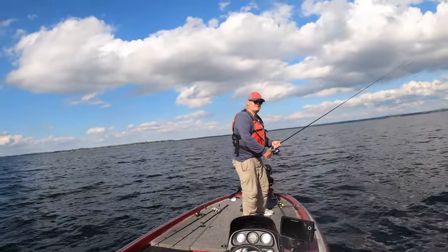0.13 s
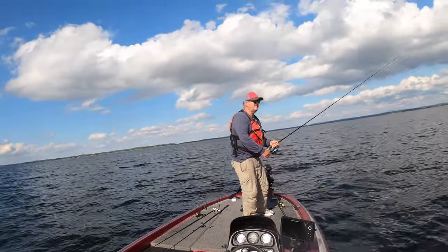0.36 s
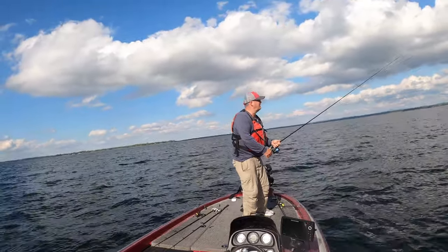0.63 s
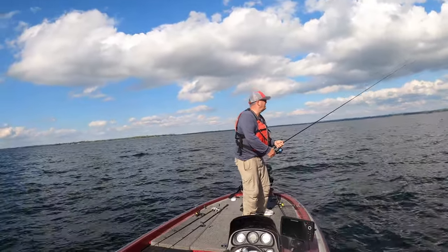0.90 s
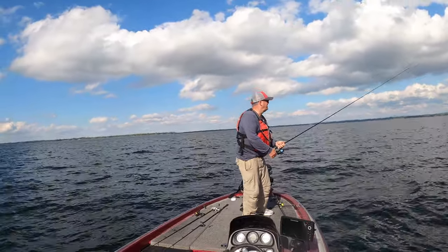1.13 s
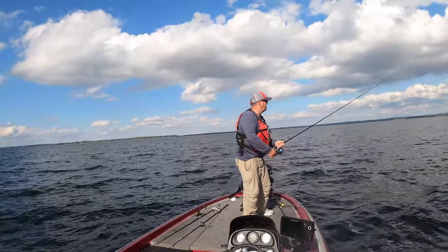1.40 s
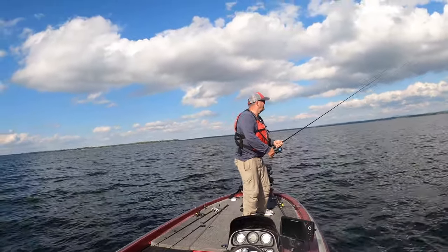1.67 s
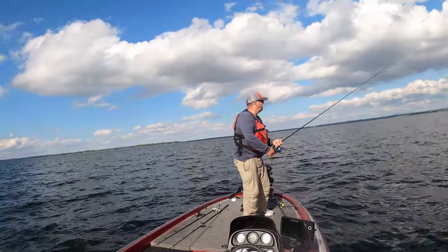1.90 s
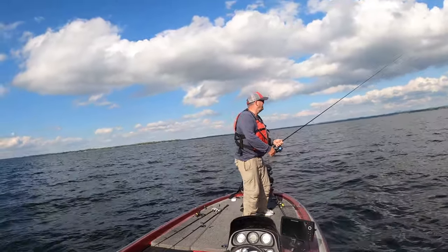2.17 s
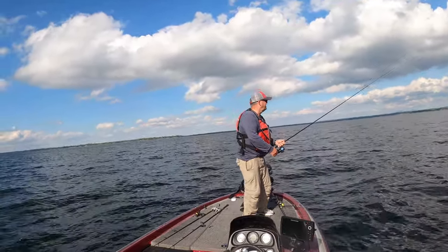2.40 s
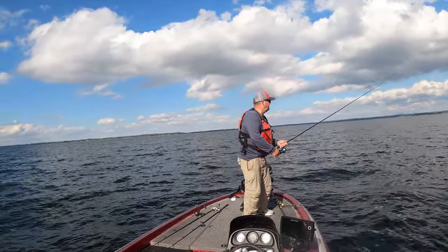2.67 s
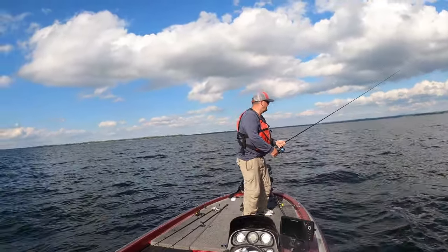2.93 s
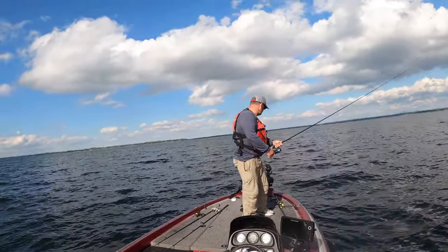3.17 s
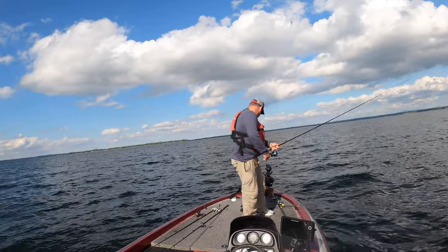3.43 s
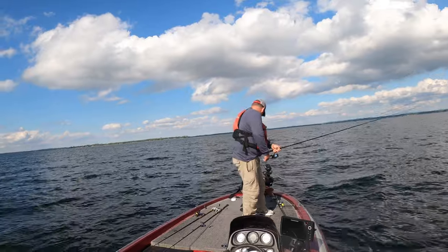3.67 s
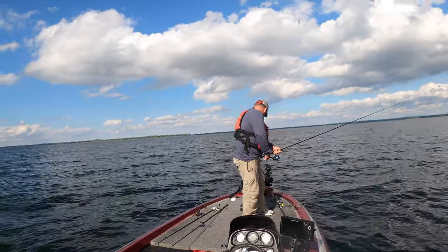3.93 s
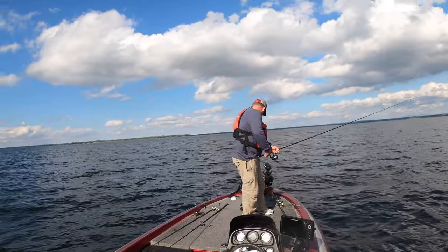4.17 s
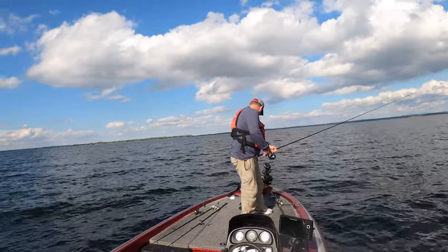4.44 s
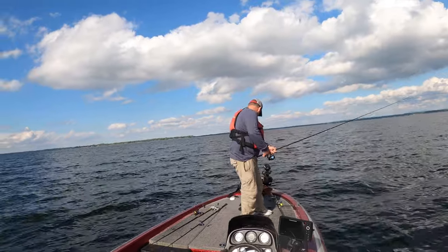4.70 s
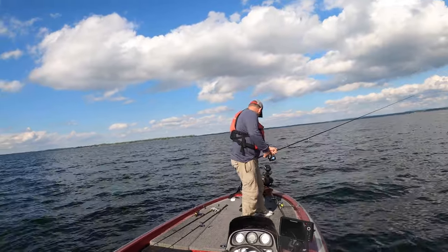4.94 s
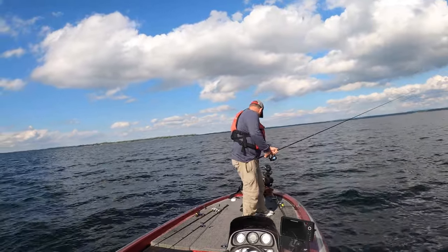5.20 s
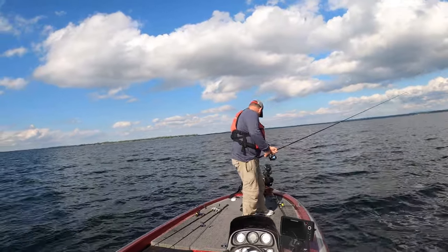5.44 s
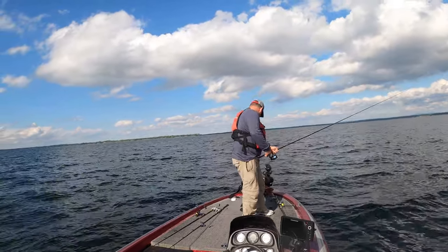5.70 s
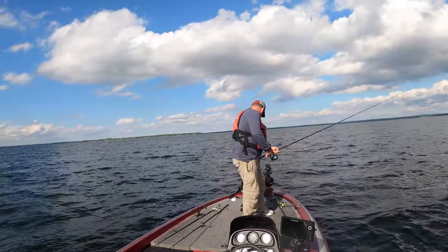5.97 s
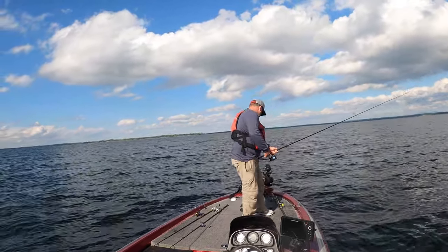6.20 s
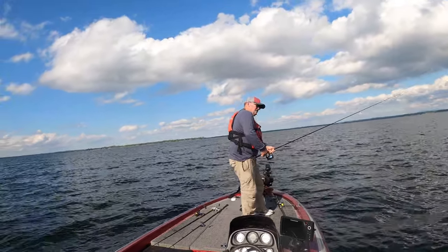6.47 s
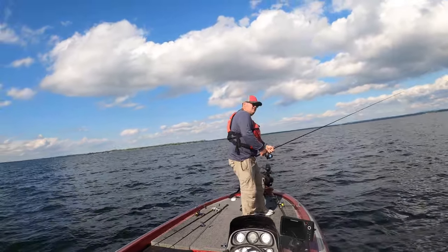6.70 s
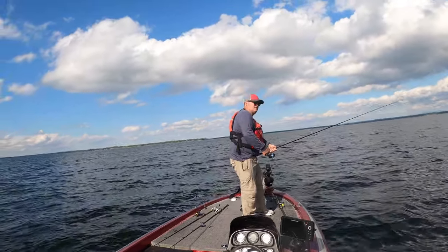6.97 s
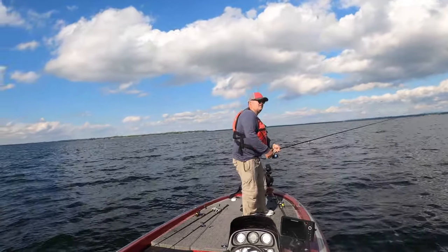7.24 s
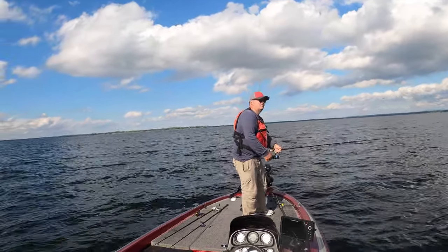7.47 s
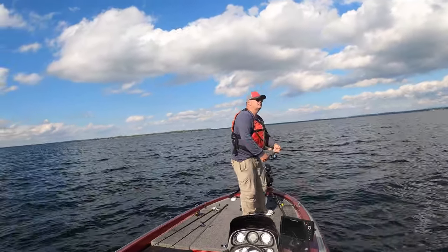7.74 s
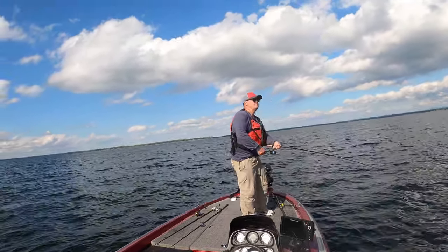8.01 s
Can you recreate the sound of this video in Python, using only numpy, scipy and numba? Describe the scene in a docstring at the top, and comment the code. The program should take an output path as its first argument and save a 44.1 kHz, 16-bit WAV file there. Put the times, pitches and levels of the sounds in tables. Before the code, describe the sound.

Outdoors on a choppy lake, a microphone on a small boat catches deep wind rumble with soft thumps. Small waves lap the hollow hull irregularly: dull knocks, bubbly plops, droplet ticks and brief fizz. The wind is heavier early and thins later, when a sharp double slap stands out past six seconds, followed by more splashing. The sound is nearly mono, widening near the end.

```python
"""On a choppy lake a small boat rocks. Wind is low-passed noise with slow heaves, flutter and thumping eddies.
Waves excite the hollow hull, a bank of damped modes; washing water is clouds of tiny ringing bubbles
over hiss. Plops and sliding gurgles are air in water; spray ticks are clusters of short rings, and
bursts of water are decaying noise. The stereo image is nearly closed at first and opens late."""
import sys
import numpy as np
from scipy import signal
from scipy.fft import rfft, irfft, next_fast_len
from scipy.io import wavfile
from scipy.ndimage import uniform_filter1d
from numba import njit

SR = 44100
rng = np.random.default_rng(int(sys.argv[2]) if len(sys.argv) > 2 else 0)


def to_wav(sig):
    """Store sig (one row per channel, or 1-D mono) as 16-bit WAV at the path in sys.argv[1].

    Samples outside -1..1 are clipped; the rate is SR.
    """
    pcm = np.clip(np.atleast_2d(sig), -1, 1) * 32767
    pcm = np.round(pcm).astype(np.int16)
    wavfile.write(sys.argv[1], SR, pcm.T)  # frames by channels


def volts(x):
    """Linear amplitude factor 10**(x/20) for a level x in dB, scalar or array-like."""
    e = np.asarray(x, float) / 20
    return 10 ** e


N = 357853  # samples


def curve(table):
    """Linear interpolation: each column after time becomes one value a sample."""
    s, *columns = np.transpose(table)
    return [np.interp(np.arange(N) / SR, s, c) for c in columns]


def colour(x, points, lo_hz=0., hi_hz=1e5, tilt_db=0.):
    """Linear filtering: gain through (Hz, dB) points, two soft band edges and a tilt in dB per octave."""
    n = next_fast_len(len(x))
    hz = np.fft.rfftfreq(n, 1 / SR) + 1  # offset keeps the logarithm finite
    p = np.array(points)
    edge = np.sqrt(1 / (1 + (lo_hz / hz) ** 8) / (1 + (hz / hi_hz) ** 8))
    db = np.interp(np.log(hz), np.log(p[:, 0]), p[:, 1]) + tilt_db * np.log2(hz / 1000)
    return irfft(rfft(x, n) * volts(db) * edge, n)[:len(x)]


def unit(x):
    """Normalization of mean power: scale to rms 1."""
    return x / np.sqrt(np.mean(x ** 2))


def even(x, s, share):
    """Envelope compression: iron out a share of the chance swelling of noise over windows of s seconds."""
    return unit(x / (uniform_filter1d(x ** 2, int(s * SR)) + 1e-18) ** (share / 2))


def walk(rate):
    """Smoothed random modulation: levels held 1 / rate s and slewed twice; spread near 1."""
    k = int(SR / rate)
    held = np.repeat(rng.standard_normal(N // k + 1), k)
    return 1.2 * uniform_filter1d(uniform_filter1d(held, k), k)[:N]


@njit
def ring(n, sr, s, size, hz, t60, rise, onset):
    """Damped oscillators: each swells over onset s and may climb by rise octaves/s, as a bubble surfacing."""
    out = np.zeros(n)
    for e in range(len(s)):
        i, z, open_ = int(s[e] * sr), size[e] + 0j, 0.
        w = 2 * np.pi * hz[e] / sr
        fade = np.exp(-6.9 / (t60[e] * sr))
        climb = 2 ** (rise[e] / sr)
        for k in range(max(i, 0), min(i + int(.8 * t60[e] * sr), n)):
            z *= fade * np.exp(1j * w)
            w = min(w * climb, 2.8)  # stay below the Nyquist limit
            open_ += (1 - open_) / (1 + onset[e] * sr)
            out[k] += open_ * z.imag
    return out


def swarm(count, lo_hz, hi_hz, cycles, spread_db, rise):
    """Superposition of random bubbles: most faint, a few loud; each climbs by rise octaves per t60."""
    u = rng.random((count, 3))
    hz = lo_hz * (hi_hz / lo_hz) ** u[:, 1]
    t60 = cycles / hz
    size = volts(spread_db * np.minimum(-np.log(1 - u[:, 2]), 3.)) * hz
    return unit(ring(N, float(SR), u[:, 0] * N / SR, size, hz, t60, rise / t60, 2.5 / hz))


def swells(s, db, rise, fall):
    """Incoherent addition: the powers of overlapping swells sum; returns the total level in dB."""
    t = np.arange(0, N / SR + .002, .001)
    u = t - s[:, None]
    span = np.where(u < 0, rise[:, None], fall[:, None])  # seconds for 20 dB
    power = volts(2 * db[:, None] - 40 * np.abs(u) / span).sum(axis=0)
    return np.interp(np.arange(N) / SR, t, 10 * np.log10(uniform_filter1d(power, size=9) + 1e-14))


# gust strength, levels before each layer's trim:
# (time [s], rumble level [dB], flutter level [dB], hull drumming level [dB])
GUSTS = [(0.0, -43, -54.5, -58.5), (0.38, -46, -55, -62), (0.99, -40, -44.5, -47),
         (1.53, -45, -57.5, -56.5), (1.83, -44, -50.5, -59.5), (2.48, -39.5, -49, -55.5),
         (2.96, -44, -55, -57), (3.41, -45, -54, -60.5), (3.66, -50.5, -56, -54), (3.84, -39, -57.5, -52),
         (3.97, -44, -56, -55), (4.4, -53.5, -55, -60), (4.7, -45.5, -57, -59.5), (5.19, -47, -55.5, -54),
         (5.44, -50, -56.5, -62), (5.76, -48, -60, -60), (6.05, -46.5, -56, -61.5),
         (6.25, -49, -52.5, -57.5), (6.44, -55, -57.5, -68.5), (6.75, -68.5, -59.5, -64),
         (7.09, -56.5, -59, -59.5), (7.45, -43, -53.5, -59.5), (7.75, -62.5, -53.5, -56.5),
         (8.11, -57.5, -58, -63.5)]
# spectrum of wind rumble and of the waves' push: (frequency [Hz], relative density [dB])
RUMBLE_SPECTRUM = [(8.8, -25), (15, 3), (43, -4), (60, -3.5), (95, -10), (129, -11.5), (197, -11),
                   (362, -27), (439, -30), (700, -38), (910, -68), (1540, -120)]


def wind():
    """Turbulent pressure at the microphone port: low noise in slow heaves and a faster flutter."""
    rumble_db, flutter_db, _ = curve(GUSTS)
    heave = even(colour(rng.standard_normal(N), RUMBLE_SPECTRUM, hi_hz=78.0), 0.44, 0.29)
    flutter = even(colour(rng.standard_normal(N), RUMBLE_SPECTRUM, 70., 151.0), 0.1, 0.27)
    flutter_gain = volts(flutter_db + 7.0 + 2.4 * walk(9))
    return volts(rumble_db + 5.0) * heave + flutter_gain * flutter


# single eddies thumping the microphone:
# (time [s], rms level at the peak [dB], central pitch [Hz], length at half amplitude [s])
EDDIES = [(0.02, -44, 122, 0.034), (0.525, -39, 51.3, 0.13), (0.564, -40.5, 41.05, 0.15),
          (0.689, -39.5, 51.4, 0.028), (0.826, -30.5, 51, 0.14), (0.846, -36, 98.4, 0.072),
          (0.938, -34.5, 91.2, 0.039), (0.939, -34.5, 40, 0.25), (1.021, -32, 40.9, 0.057),
          (1.207, -41.5, 42, 0.61), (1.34, -31, 40, 0.071), (1.752, -31, 106, 0.026),
          (2.017, -34, 41.57, 0.15), (2.19, -37, 89.8, 0.034), (2.228, -31.5, 36.04, 0.07),
          (2.445, -26, 48.2, 0.03), (2.446, -35, 87.3, 0.021), (2.572, -35, 44.1, 0.032),
          (2.588, -40.5, 125.2, 0.061), (2.93, -35, 35.47, 0.056), (3.229, -34, 36.4, 0.043),
          (3.46, -34, 42.56, 0.077), (3.866, -32.5, 45, 0.051), (3.867, -42, 107, 0.11),
          (4.07, -40.5, 50.2, 0.29), (4.239, -38, 35.63, 0.035), (5.304, -35, 45.7, 0.058),
          (5.999, -29, 32, 0.059), (6.057, -36, 122, 0.082), (6.082, -45.5, 36.23, 0.13),
          (6.333, -45, 123.4, 0.02), (6.361, -33, 36.4, 0.093), (6.412, -43, 128, 0.09),
          (6.647, -34, 32.63, 0.033), (7.379, -38, 46.7, 0.064), (7.523, -43, 41, 0.048),
          (7.56, -40.5, 108, 0.027), (7.674, -37, 131.6, 0.06), (7.707, -38.5, 51.7, 0.16)]


def buffets():
    """Eddies as Gaussian wave packets whose frequency wanders about a central pitch."""
    out = np.zeros(N)
    turns = np.cumsum(2 ** (0.32 * walk(30))) / SR  # an eddy has no firm pitch
    t = np.arange(N) / SR
    for (s, db, hz, length), start in zip(EDDIES, rng.random(len(EDDIES))):
        near = slice(max(int((s - 2 * length) * SR), 0), int((s + 2 * length) * SR))
        envelope = .5 ** ((2 * (t[near] - s) / length) ** 2)
        tone = np.sin(2 * np.pi * (hz * turns[near] + start))
        out[near] += np.sqrt(2) * volts(db) * envelope * tone
    return out


def surge():
    """Broadband forcing: waves push the hull steadily, heard as noise in a low band."""
    push = rng.standard_normal(N) * volts(1.8 * walk(16))
    return volts(curve(GUSTS)[2] + 2.5) * unit(colour(push, RUMBLE_SPECTRUM, 177.0, 400.0))


# laps of water along the hull; rise and fall of the fizz span 20 dB, levels before layer trims:
# (crest time [s], fizz level [dB], rise [s], fall [s], spray over fizz [dB])
LAP_SWELLS = [(0.021, -57.5, 0.053, 0.064, -11.5), (0.053, -70, 0.03, 0.074, 4),
              (.13, -65, 0.14, 0.24, -5.5), (.25, -67, 0.068, 0.046, 1.5), (0.311, -66, 0.081, 0.16, -9),
              (.55, -79, 0.55, 0.68, -7), (.8, -53, 0.052, 0.13, -13), (.84, -57, 0.1, 0.11, -4.5),
              (.97, -68, 0.18, 0.22, -6.5), (1.08, -62, 0.034, 0.11, -14), (1.12, -66, .04, 0.032, -14),
              (1.4, -65.5, 0.29, 0.33, -1.5), (1.58, -64, 0.87, 0.61, -13.5), (1.75, -70.5, 0.41, 0.17, -2),
              (1.91, -59.5, 0.15, 0.24, -7.5), (2.03, -68.5, 0.053, 0.1, 1.5),
              (2.13, -61.5, 0.033, 0.08, -5.5), (2.2, -69, 0.044, 0.33, -7),
              (2.33, -71.5, 0.063, 0.56, -24), (2.43, -74, 0.05, 0.12, 0), (2.6, -71.5, 0.071, 0.08, 5),
              (2.78, -67.5, 0.17, 0.14, -6), (2.97, -69, 0.33, 0.44, -4), (3.228, -64, 0.024, 0.045, -23),
              (3.27, -67.5, 0.034, 0.067, -18), (3.41, -71.5, 0.44, 0.77, -4),
              (3.62, -80.5, 0.4, 0.55, 2.5), (3.812, -54.5, 0.13, 0.14, -6.5),
              (3.901, -61, 0.038, 0.29, -2.5), (4.0, -59, 0.069, 0.091, -9.5), (4.12, -86, 0.27, 0.16, -5),
              (4.27, -66.5, 0.44, 0.31, 2), (4.42, -59.5, 0.4, 0.32, -7.5), (4.56, -69, 0.11, 0.59, -7),
              (4.68, -71, 0.21, 0.17, -0.5), (4.77, -59, 0.033, 0.085, -3.5), (4.95, -67, 0.21, 0.88, -8),
              (5.149, -53.5, 0.064, 0.07, -5.5), (5.23, -66, 0.13, 0.13, 0), (5.47, -73, 0.053, 0.45, -4),
              (5.64, -64.5, 0.017, 0.053, -28), (5.89, -76.5, 0.15, 0.32, -7),
              (6.035, -59.5, 0.032, 0.11, -9), (6.252, -51, 0.082, 0.23, -4.5),
              (6.39, -57, 0.15, 0.12, -22), (6.44, -59, 0.071, 0.12, -19), (6.63, -63, 0.37, 0.26, -4),
              (6.749, -63.5, 0.29, 0.13, -3.5), (7.0, -79, 0.38, 0.26, -5), (7.23, -75, 0.11, 0.048, -4),
              (7.341, -57.5, 0.085, 0.089, -3.5), (7.45, -53.5, 0.022, 1, -11.5),
              (7.57, -52, 0.17, 0.14, -1.5), (7.66, -49.5, 0.18, 0.12, -8), (7.77, -63.5, 0.14, 0.11, 2.5),
              (8.0, -70.5, 0.26, 0.33, -3)]
# clouds of big bubbles; rise and fall span 20 dB: (crest time [s], level [dB], rise [s], fall [s])
SLOSH_SWELLS = [(.43, -63.5, 0.2, 0.36), (.86, -48.5, 0.083, 0.11), (.99, -65, 0.24, 0.043),
                (2.66, -68.5, 0.35, 0.76), (3.7, -60, 0.15, 0.1), (3.91, -61.5, 0.036, 0.59),
                (4.56, -67, 0.027, 0.027), (5.15, -54, 0.064, 0.079), (5.219, -46, 0.053, 0.033),
                (5.398, -67, 0.44, 0.094), (5.47, -54, 0.018, 0.045), (5.83, -62, 0.054, 0.1),
                (6.28, -41, 0.024, 0.038), (6.37, -51, 0.071, 0.017), (6.439, -42.5, 0.064, 0.014),
                (7.2, -78, 0.13, 0.18), (7.34, -48, 0.024, 0.02), (7.45, -53.5, 0.019, 0.15),
                (7.56, -69, 0.15, .2), (7.66, -44.5, 0.056, 0.095), (8.04, -63.5, 0.14, 0.51)]
# spectrum of foaming water: (frequency [Hz], relative density [dB])
FIZZ_SPECTRUM = [(210, -33.5), (350, 7.5), (480, 1), (600, 1.5), (770, -2), (1330, 0), (1670, -3),
                 (2510, -9), (3140, -12.5), (5290, -21.5), (7110, -24.5), (8650, -21.5), (10100, -34),
                 (11500, -42), (13500, -45), (16000, -79)]


def wash():
    """Bubble resonance, smaller being higher: big ones slosh, small ones fizz, the finest crackle over hiss."""
    s, db, rise, fall, bright_db = np.transpose(LAP_SWELLS)
    fizz_db = swells(s, db, rise, fall)
    spray_db = swells(s, db + bright_db, 0.81 * rise, 0.89 * fall)
    # dull laps carry more big bubbles
    carried = np.transpose([s, db - 4.5 - 0.28 * bright_db, rise, fall])
    slosh_db = swells(*np.vstack([carried, SLOSH_SWELLS]).T)
    # bursting foam: sparse snaps too short to have a pitch
    snaps = swarm(count=500, lo_hz=1950.0, hi_hz=7000., cycles=2.4, spread_db=0.5, rise=0.)
    out = volts(spray_db - 8.5) * unit(colour(snaps, FIZZ_SPECTRUM, 1400.0))
    # droplets falling back: short rounded blips that follow the louder laps
    blips = swarm(count=3200, lo_hz=800., hi_hz=4500., cycles=18., spread_db=3.2, rise=.2)
    out += volts(fizz_db - 2) * unit(colour(blips, FIZZ_SPECTRUM, 700., 5500., tilt_db=3.))
    big = swarm(count=700, lo_hz=350., hi_hz=1002.0, cycles=31.0, spread_db=4.0, rise=0.32)
    small = swarm(count=2200, lo_hz=796.0, hi_hz=3300.0, cycles=30.0, spread_db=2.0, rise=0.27)
    fine = swarm(count=2500, lo_hz=2500., hi_hz=6000., cycles=50., spread_db=2.0, rise=.4)
    finest = swarm(count=2500, lo_hz=5000., hi_hz=12600.0, cycles=78.0, spread_db=3.0, rise=0.47)
    # near level [dB], far level [dB], band edges [Hz], cloud, share of hiss
    for near_db, far_db, lo, hi, cloud, hiss in (
            (slosh_db, -82, 400., 900., big, .8),
            (fizz_db - 1.5, -78, 900., 2800., small, .45),
            (spray_db - 1.5, -89, 2800., 5600., fine, .5),
            (spray_db - 6.5, -94, 5600., 3e4, finest, .5)):
        bed = hiss * rng.standard_normal(N) * volts(3.07 * walk(20) + 1.6 * walk(140))
        bubbles = 0.42 * cloud * np.sqrt(4 * lo / SR)
        # the far lake keeps a steady floor under the near water
        level = np.hypot(volts(near_db), volts(far_db))
        out += level * unit(colour(bed + bubbles, FIZZ_SPECTRUM, lo, hi))
    return out


# pockets of air closing or opening, the note sliding; with a bend over 1 the slide comes late:
# (start time [s], length [s], first pitch [Hz], last pitch [Hz], level [dB], bend [1])
AIR_POCKETS = [(.004, 0.028, 1020, 1450, -49.5, 2.9), (0.295, 0.14, 500, 687, -58, 2.9),
               (3.635, 0.036, 740, 610, -54, 0.56), (3.696, 0.053, 930, 1256, -55, 0.44),
               (5.344, .086, 440, 1500, -51, 2.1), (5.463, 0.027, 1300, 1005, -48, 0.66),
               (6.337, 0.048, 640, 515, -38.5, 0.92), (6.4, 0.072, 848, 402, -54, 1.15)]


def gurgles():
    """Frequency modulation: an air pocket's note slides and wobbles into a narrow rough band."""
    out = np.zeros(N)
    t = np.arange(N) / SR
    for s, length, first_hz, last_hz, db, bend in AIR_POCKETS:
        u = np.clip((t - s) / length, 0, 1)
        hz = first_hz * (last_hz / first_hz) ** (u ** bend)
        gate = np.clip(np.minimum(u * length / 0.0046, (1 - u) / .14), 0, 1)
        roughness = (0.5 + 0.52 * walk(260)) * volts(2.0 * walk(99))
        phase = 2 * np.pi * np.cumsum(hz * 2 ** (0.0604 * walk(150))) / SR
        out += np.sqrt(2) * gate * roughness * volts(db) * np.sin(phase)
    return out


# single bubbles: (time [s], level before onset and flutter [dB], starting pitch [Hz], main tone's t60 [s])
BUBBLES = [(0.005, -40, 1013, 0.03), (.012, -46.5, 814, 0.068), (0.022, -39, 2200, 0.019),
           (.1, -56, 860, 0.045), (0.122, -56, 1110, 0.077), (.145, -61, 1570, .03), (.165, -59, 1200, .04),
           (.18, -57.5, 1790, 0.033), (0.231, -51, 2160, 0.045), (.24, -45.5, 2255, 0.051),
           (.264, -54, 1450, 0.06), (0.314, -43, 1433, 0.096), (0.349, -40, 510, 0.032),
           (.358, -53, 1060, 0.033), (0.372, -54.5, 1520, 0.097), (0.387, -40, 620, 0.03),
           (.425, -55, 796, 0.086), (0.47, -50, 1060, 0.046), (.478, -49, 1190, 0.035),
           (.81, -39, 1090, 0.026), (.8435, -46, 2120, .02), (0.855, -25, 660, 0.029),
           (.876, -49, 1730, 0.033), (.894, -47, 1440, 0.033), (0.951, -38.5, 730, 0.03),
           (1.09, -54, 1690, 0.033), (1.11, -52, 1085, .04), (1.125, -56, 2130, 0.028),
           (1.167, -51.5, 618, 0.11), (1.336, -44.5, 730, 0.02), (1.506, -50, 1250, 0.044),
           (1.557, -42, 1540, 0.025), (1.86, -47.5, 1364, 0.063), (1.885, -39.5, 1670, 0.019),
           (1.912, -47, 2190, 0.037), (1.914, -42.5, 502, 0.12), (2.059, -52, 1210, .02),
           (2.135, -50, 1220, 0.043), (2.19, -52.5, 1350, 0.053), (2.319, -50, 1470, 0.038),
           (2.815, -55, 640, 0.13), (2.96, -58.5, 1310, .07), (3.392, -53.5, 1214, 0.073),
           (3.573, -54, 790, 0.049), (3.69, -43, 756, 0.048), (3.73, -50, 1360, .025),
           (3.763, -51, 2040, .02), (3.788, -45, 2160, 0.014), (3.806, -43, 1300, 0.028),
           (3.809, -43, 2150, 0.018), (3.821, -44, 1930, 0.046), (3.89, -44, 1160, .025),
           (3.94, -47, 1000, .02), (3.952, -54, 2400, .02), (3.989, -37, 1170, .015),
           (3.993, -30, 1410, 0.032), (4.028, -51, 895, 0.079), (4.226, -59, 1500, .02),
           (4.287, -49, 1150, .02), (4.342, -46, 1470, 0.025), (4.374, -46, 1650, .015),
           (4.378, -47, 2360, 0.025), (4.388, -46, 1040, .02), (4.408, -47, 1250, 0.018),
           (4.425, -48, 1010, .03), (4.476, -50, 1790, 0.022), (4.555, -43, 1430, 0.036),
           (4.744, -48, 1450, 0.05), (4.765, -48, 1380, 0.058), (4.944, -45, 1150, 0.039),
           (5.131, -42, 647, 0.091), (5.209, -44, 1060, 0.071), (5.21, -46, 630, 0.046),
           (5.324, -38, 485, 0.093), (5.472, -61, 825, 0.033), (5.809, -41.5, 599, 0.072),
           (6.0308, -26.5, 1260, 0.014), (6.036, -40, 1350, 0.039), (6.0435, -30.5, 1110, 0.017),
           (6.065, -50, 1290, 0.1), (6.095, -52, 1335, 0.08), (6.201, -50, 2100, 0.027),
           (6.243, -33.5, 500, 0.039), (6.265, -23.5, 680, 0.026), (6.265, -32, 1940, 0.018),
           (6.354, -23.5, 530, 0.027), (6.39, -44, 1290, 0.06), (6.418, -47, 875, .03),
           (6.425, -53, 2000, .03), (6.452, -51, 2110, .025), (6.625, -45, 1770, .025),
           (6.745, -53, 1106, 0.068), (7.002, -63.5, 1290, 0.11), (7.277, -54, 1400, 0.035),
           (7.325, -35.5, 650, 0.031), (7.35, -48, 1980, 0.022), (7.446, -37, 1370, 0.018),
           (7.447, -40, 890, 0.034), (7.49, -37, 1030, .03), (7.541, -48, 850, 0.027),
           (7.598, -41.5, 1440, .06), (7.634, -32, 508, 0.038), (7.739, -49, 586, 0.31),
           (7.916, -59, 760, 0.15), (7.945, -52.5, 1730, 0.057), (7.997, -44.5, 810, 0.041),
           (8.006, -50, 1290, 0.033)]


def plops():
    """Bubble resonance with beating: a rising damped tone and two detuned neighbours that roughen it."""
    s, db, hz, t60 = np.transpose(BUBBLES)
    scatter = rng.standard_normal((len(s), 4))
    rise = 1.7 + 0 * s  # octaves/s
    out = ring(N, float(SR), s, volts(db), hz, t60, rise, 1.1 / hz)
    for k in range(2):
        late = 0.0077 * np.abs(scatter[:, 2 + k])
        near_hz = hz * (1 + 0.079 * scatter[:, k])
        out += ring(N, float(SR), s + late, volts(db - 6), near_hz, 0.61 * t60, rise, 12.0 / hz)
    return out * (1 + 0.3 * walk(250))  # the surface shakes


# spray drops hitting water and hull; level and decay are scaled for each ring of the cluster:
# (time [s], reference level [dB], reference pitch [Hz], reference decay [s])
SPRAY = [(0.049, -51, 3520, 0.043), (.051, -48, 4230, 0.018), (0.013, -50, 4300, .02),
         (0.04, -58, 4340, 0.036), (.078, -58, 3700, .02), (0.09, -55, 2720, .02),
         (0.119, -62, 4320, 0.013), (0.144, -51, 2400, .02), (.16, -64, 3300, 0.017),
         (0.193, -50, 2920, 0.035), (0.243, -41, 2700, 0.023), (0.2637, -52, 3370, 0.034),
         (0.279, -45, 2160, 0.027), (0.337, -55, 2320, 0.066), (0.567, -60, 4500, .01),
         (0.708, -59, 3120, 0.06), (0.7962, -45.5, 2670, 0.044), (1.322, -45.5, 3100, 0.018),
         (1.396, -33, 3020, 0.0073), (1.438, -51, 3260, 0.014), (1.454, -55, 3320, 0.024),
         (1.489, -46, 3170, 0.026), (1.509, -42.5, 3170, 0.018), (1.559, -50, 2680, 0.022),
         (1.6283, -45, 2650, 0.02), (1.7137, -53, 2680, 0.037), (1.756, -55, 3300, 0.022),
         (2.027, -42.5, 3010, 0.1), (2.029, -52, 4440, 0.028), (2.201, -63.5, 5880, 0.061),
         (2.506, -54, 3800, 0.021), (2.578, -36, 3700, 0.013), (2.84, -60, 4760, 0.025),
         (2.904, -57.5, 3770, 0.024), (3.0051, -54, 2680, .025), (3.331, -49.5, 2950, 0.04),
         (3.4014, -50, 2670, 0.026), (3.467, -47, 2740, 0.025), (3.681, -56, 2730, 0.063),
         (3.7479, -54, 4620, 0.024), (3.7834, -57, 4650, 0.019), (3.878, -37, 4540, 0.031),
         (3.8823, -40.5, 3880, 0.031), (3.88, -50, 5660, 0.013), (3.912, -55, 5200, .025),
         (4.235, -39, 2990, 0.017), (4.214, -50, 3120, 0.036), (4.263, -47, 3200, .03),
         (4.267, -55, 4600, .02), (4.4, -58, 5000, .02), (4.437, -56, 2900, .015), (4.46, -52, 3200, 0.022),
         (4.314, -46, 2790, 0.037), (4.544, -43, 2500, 0.02), (4.614, -52, 2660, 0.044),
         (4.6833, -38.5, 2790, 0.022), (4.741, -49, 2560, .04), (4.7662, -46, 2650, 0.034),
         (4.824, -44.5, 2580, 0.022), (5.1435, -39, 3300, 0.025), (5.464, -40.5, 2590, 0.018),
         (5.515, -54, 6740, 0.032), (5.791, -57.5, 7440, 0.0087), (5.884, -59, 6100, 0.037),
         (6.0328, -56, 3900, 0.0099), (6.046, -57, 5760, .025), (6.046, -56, 2900, 0.012),
         (6.08, -57, 2800, 0.01), (6.112, -60, 2420, .015), (6.1232, -49.5, 2860, 0.022),
         (6.221, -42, 2840, 0.026), (6.246, -31, 2600, 0.021), (6.2678, -42, 5100, 0.0082),
         (6.421, -55, 7560, 0.017), (6.4856, -51.5, 8040, 0.016), (6.495, -39, 2780, 0.014),
         (6.586, -44.5, 5280, 0.011), (6.723, -48.5, 2860, 0.021), (6.916, -61, 3070, 0.032),
         (6.989, -62.5, 5470, 0.026), (7.224, -53.5, 3060, 0.025), (7.3397, -44.5, 2570, 0.026),
         (7.45, -45, 3460, 0.011), (7.47, -44, 2480, 0.022), (7.5453, -34, 2090, 0.02),
         (7.5588, -33, 3200, 0.022), (7.761, -43, 2720, 0.026), (7.948, -51, 2600, .012),
         (7.951, -44, 4670, 0.016), (7.987, -53, 5380, 0.017), (8.021, -65, 2860, .02)]


def ticks():
    """Impact excitation: a drop lands with a short snap and a cluster of tiny damped rings."""
    s, db, hz, t60 = np.transpose(SPRAY)
    scatter = rng.standard_normal((len(s), 12))
    out = ring(N, float(SR), s, volts(db - 1), hz, .8 * t60, 0 * s, 5.1 / hz)
    for k in range(6):
        # neighbouring droplets are smaller and smear the tick, mostly upward
        octaves = .4 * np.minimum(np.abs(scatter[:, k]), 1.6) - .2
        near_hz = np.clip(hz * 2 ** octaves, 500, 9300)
        late = 0.0031 * np.abs(scatter[:, 6 + k])
        out += ring(N, float(SR), s + late, volts(db - 4.0), near_hz, 0.39 * t60, 0 * s, 4.2 / hz)
    out *= 1 + 0.28 * walk(900)  # the water surface shakes, so no ring stays pure
    # the snap lasts about one cycle
    return out + ring(N, float(SR), s, volts(db - 8.5), 0.41 * hz, 2.6 / hz, 0 * s, 0 * s)


# water bursting against the hull:
# (time [s], level before trim [dB], t60 [s], brightness [dB per octave])
HULL_BURSTS = [(.314, -54, .015, 2), (0.796, -37, 0.023, -4), (0.83, -47, 0.017, 16),
               (.8435, -36, 0.016, 2), (1.0725, -51, 0.018, -1.5), (1.912, -47.5, 0.02, 6),
               (2.115, -62, 0.019, 10), (2.579, -39.5, 0.028, 0), (3.226, -53, 0.014, -7),
               (3.2637, -28, 0.014, -5.5), (3.6808, -46.5, 0.048, -0.5), (4.681, -53, 0.008, -2),
               (7.218, -53, 0.013, 1), (4.544, -42.5, 0.056, 1), (5.129, -43, 0.036, -2),
               (5.144, -50, 0.027, 10), (5.207, -54, 0.026, 12), (5.261, -38, 0.074, -2.5),
               (5.322, -48, 0.025, -1.5), (5.465, -49, 0.014, 4), (4.7673, -44.5, 0.028, 3),
               (6.032, -47, 0.056, 0.5), (6.2658, -13.5, 0.014, 7), (6.288, -37, 0.018, 3),
               (6.299, -31, .015, 0), (6.313, -43, .02, -1.5), (6.325, -39, 0.02, -4.5),
               (6.348, -32, 0.029, -0.5), (7.446, -42.5, 0.032, 3), (7.541, -32.5, 0.058, -0.5),
               (7.559, -30, 0.027, 0)]


def bursts():
    """Impulsive noise: broadband bursts with a sharp contact and an exponential decay."""
    out = np.zeros(N)
    t = np.arange(-1024, 7168) / SR
    for s, db, t60, tilt_db in HULL_BURSTS:
        decay = volts(-60 * np.abs(t) / np.where(t > 0, t60, .002))
        burst = rng.standard_normal(len(t)) * decay
        burst[t == 0] += 9.  # the first contact
        burst = colour(burst, FIZZ_SPECTRUM, 280.0, 10000.0, tilt_db=tilt_db)
        i = int((s + t[0]) * SR)
        out[i:i + len(t)] += volts(db - 7.0) * burst / np.sqrt(np.sum(burst ** 2) / (0.056 * t60 * SR))
    return out


# wave slaps: (time [s], level before trim [dB], length of the push [s],
# brightness [dB per octave], highest pitch driven [Hz])
WAVE_SLAPS = [(0.734, -39.5, 0.033, 9.5, 436), (0.985, -34, 0.024, 11.5, 438),
              (1.09, -27.5, 0.039, -16, 316), (1.912, -37.5, 0.056, -0.5, 650),
              (2.115, -31.5, 0.071, 8, 398), (2.579, -23.5, 0.052, 0.5, 624), (3.261, -32, 0.072, 3.5, 360),
              (3.795, -30, 0.045, 4, 450), (3.856, -36, 0.047, -9, 400), (3.895, -38.5, 0.072, 3.5, 650),
              (4.772, -35.5, 0.057, -16, 350), (5.15, -26, 0.042, -5, 324), (5.269, -34.5, 0.083, -10, 408),
              (6.051, -34, 0.046, -12, 300), (6.268, -31, .015, 0, 600), (6.288, -15.5, 0.028, -3.5, 380),
              (6.327, -22.5, 0.049, -6.5, 400), (6.353, -27, 0.034, -4, 600),
              (6.412, -33.5, 0.065, 3.5, 596), (7.195, -43, 0.088, -1, 490), (7.336, -37, 0.02, -12, 605),
              (7.551, -35.5, 0.052, -4, 450), (7.648, -25.5, 0.039, -9.5, 450),
              (7.712, -37.5, 0.033, -22, 330), (7.77, -36, 0.038, -23, 324)]
# modes of the shell, before the water's load: (frequency [Hz], width of one resonator stage [Hz], gain [dB])
HULL_MODES = [(122.7, 29, -3.5), (186.5, 38.3, 2), (234.6, 71, 2.5), (300, 51, 0), (358, 54, -2.5),
              (450, 44, -4), (535.5, 34, -4.5), (650, 110, -16.5)]


def slaps():
    """Modal excitation: each sudden push of a wave rings the broad resonances of the hull."""
    out = np.zeros(N)
    n = 16384  # samples a blow
    u, hz = np.arange(n) / SR, np.fft.rfftfreq(n, 1 / SR) + 1
    for s, db, length, tilt_db, top_hz in WAVE_SLAPS:
        # the water clinging to the shell retunes it a little at every blow
        load = 1 + .05 * rng.standard_normal(len(HULL_MODES))
        modes = []
        for (f, width, gain_db), k in zip(HULL_MODES, load):
            detuning = (hz / (f * k) - f * k / hz) * f / width
            modes.append(volts(gain_db) / (1 + 1j * detuning) ** 2)
        resonant = irfft(rfft(rng.standard_normal(n)) * sum(modes), n)
        push = even(rng.standard_normal(n) + 3 * resonant, 0.0092, .6) * np.exp(-(u / length) ** 3)
        push[:40] += 4.2 * np.hanning(40)  # the crest lands first, the broken water follows
        shell = 0
        for (f, _, _), mode in zip(HULL_MODES, modes):
            shell = shell + volts(tilt_db * np.log2(f / 200)) * mode / (1 + (f / top_hz) ** 6)
        blow = irfft(rfft(push) * shell, n)
        # a blow of given strength and length delivers the same energy however the water breaks
        blow *= volts(db - 9.5) / np.sqrt(np.sum(blow ** 2) / (length * SR))
        i = int(s * SR)
        out[i:i + n] += blow[:N - i]
    return out


# rumble of opposite sign at the two ports: (time [s], level before flutter [dB])
PORT_GUSTS = [(0, -100), (5.84, -100), (5.86, -75), (6.0, -57), (6.12, -65), (6.25, -52), (6.4, -55),
              (6.55, -70), (6.64, -47), (6.69, -48), (6.75, -63.5), (7.05, -68.5), (7.2, -47.5),
              (7.38, -43), (7.46, -59), (7.58, -43), (7.78, -49), (7.92, -46), (8.11, -60)]
# its spectrum: (frequency [Hz], relative density [dB])
PORT_SPECTRUM = [(10, -18), (25, 2.5), (60, -3.5), (100, -13.5), (150, -26), (300, -34.5), (700, -52),
                 (1500, -87.5)]


def port_wind():
    """Uncorrelated turbulence: separate wind noise for the difference between the ports."""
    rumble = unit(colour(rng.standard_normal(N), PORT_SPECTRUM))
    return rumble * volts(curve(PORT_GUSTS)[0] + 2.5 * walk(18))


# stereo image, nearly closed and opening late: (time [s], width gain [dB], left minus right level of mid [dB])
IMAGE = [(0, -60.5, 0), (5.8, -60.5, 0), (5.9, -13.5, -1.5), (6.3, -10.5, 0), (6.7, -15.5, 0.5),
         (7.0, 6.5, 2), (7.3, -3, -1), (8.11, -1, 1.5)]
# spectrum of the water's side signal: (frequency [Hz], gain [dB])
SIDE_SPECTRUM = [(190, -18.5), (330, -14), (570, -16), (1010, -18.5), (1770, -19.5), (3120, -20.5),
                 (5490, -11), (9650, -0.5)]


def scene():
    """Mid-side superposition: a centred image at first; later wind and water differ between the ports."""
    water = surge() + wash() + gurgles() + plops() + ticks() + bursts() + slaps()
    mid = wind() + buffets() + water
    width_db, pan_db = curve(IMAGE)
    # a small lag between the ports leaves the slope of the sound in their difference
    slope = np.gradient(water) * SR / (2 * np.pi * 1000)
    lagged = colour(slope, [(20, 0.0038), (20000, 0.0043)], 340., tilt_db=-5.5)
    side = volts(width_db) * colour(lagged, SIDE_SPECTRUM) + port_wind()
    return np.array([mid * volts(pan_db / 2) + side, mid * volts(-pan_db / 2) - side])


def roll_off(x):
    """The treble ends steeply here."""
    return signal.sosfilt(signal.butter(12, 13650, fs=SR, output="sos"), x)


# treble response of the microphone housing: (frequency [Hz], gain [dB])
HOUSING = [(4300, -2.5), (5200, 1.5), (5900, 0.5), (6400, 0), (6900, -3), (7600, -4.5), (8400, -5),
           (9100, -5.5), (9800, -4.5)]


def record(dry):
    """Linear response and additive noise: the housing colours the treble and a faint electronic hiss joins."""
    coloured = np.array([colour(channel, HOUSING) for channel in dry])
    heard = coloured + volts(-104) * rng.standard_normal(dry.shape)
    return roll_off(heard)


dry = scene()
out = record(dry)
to_wav(out)
```